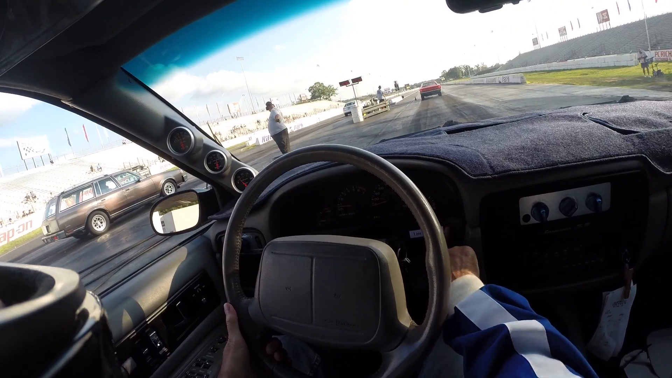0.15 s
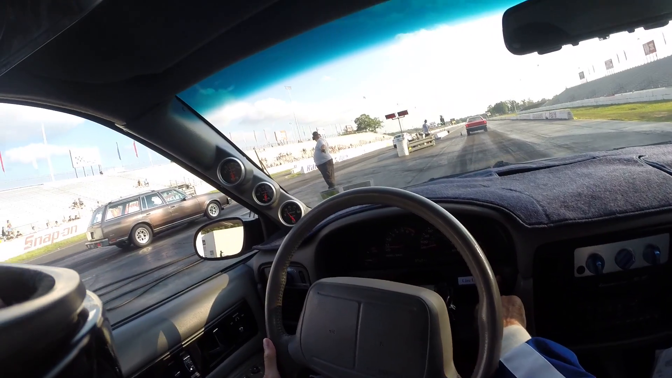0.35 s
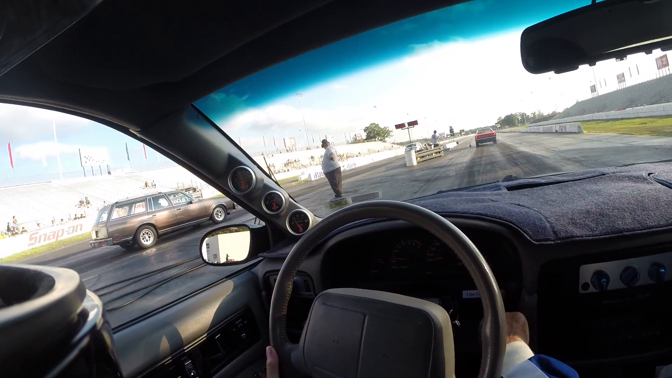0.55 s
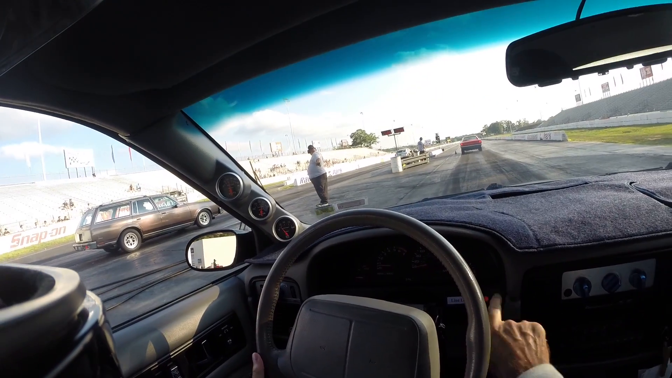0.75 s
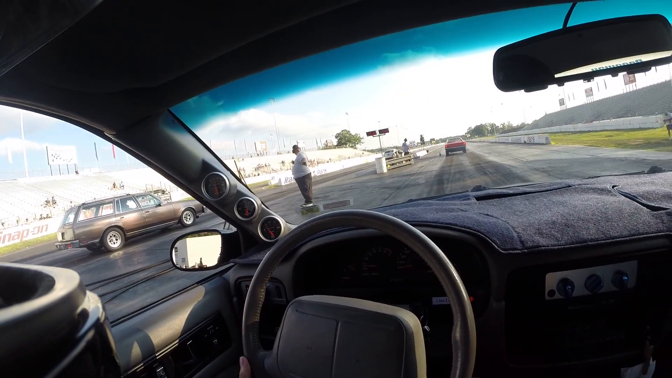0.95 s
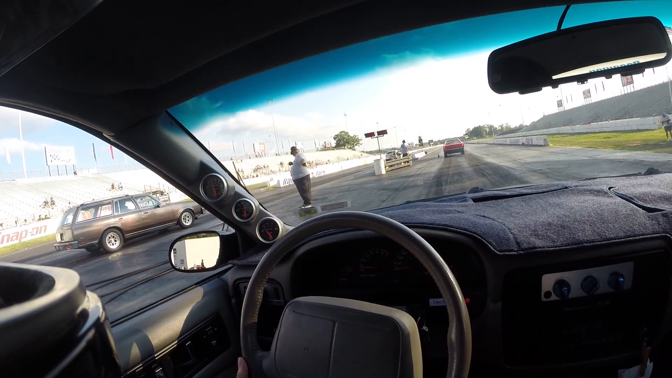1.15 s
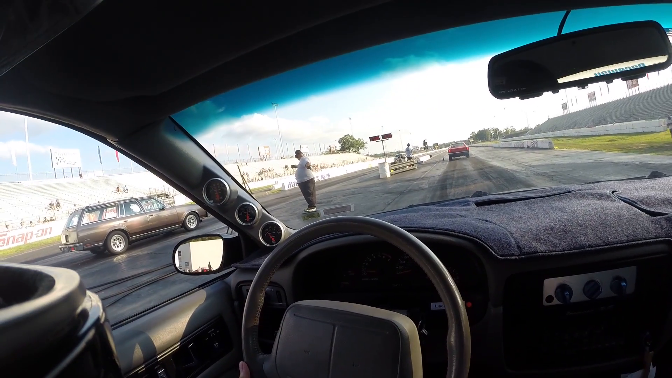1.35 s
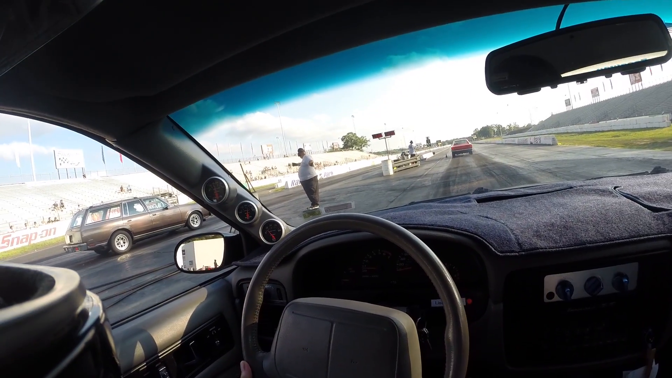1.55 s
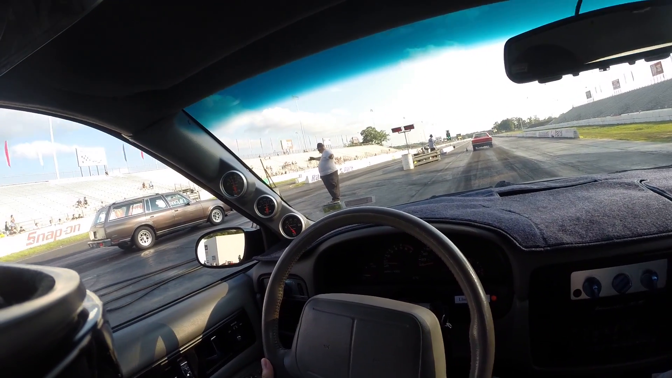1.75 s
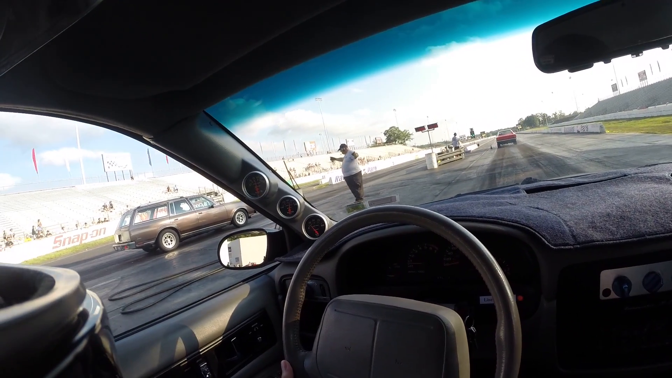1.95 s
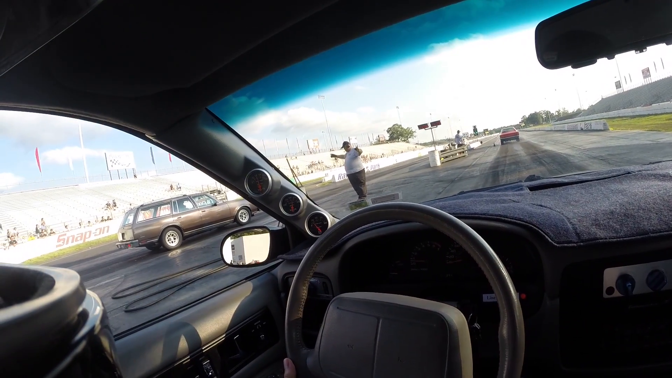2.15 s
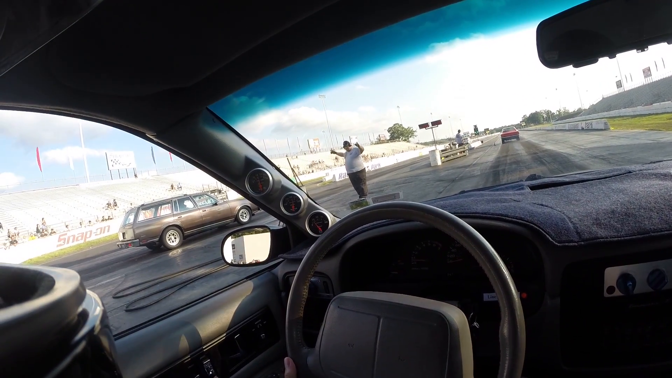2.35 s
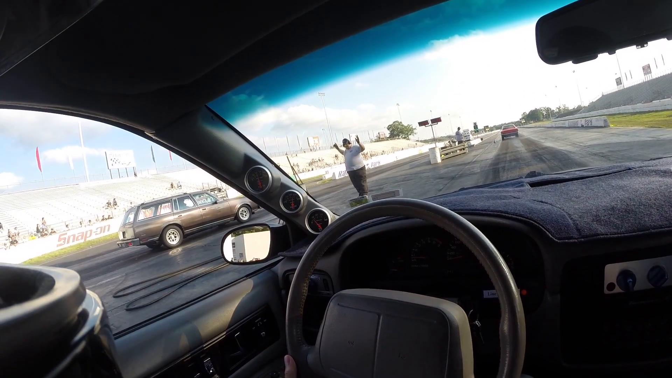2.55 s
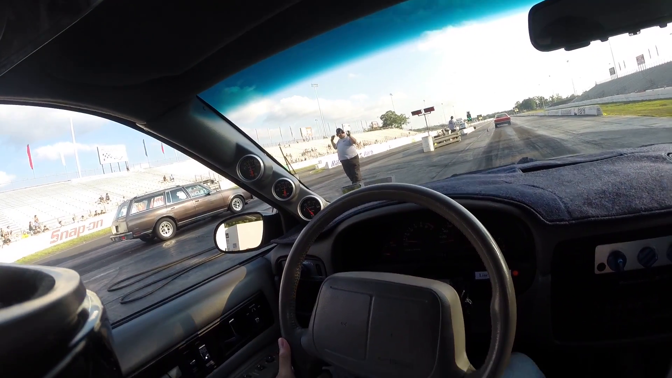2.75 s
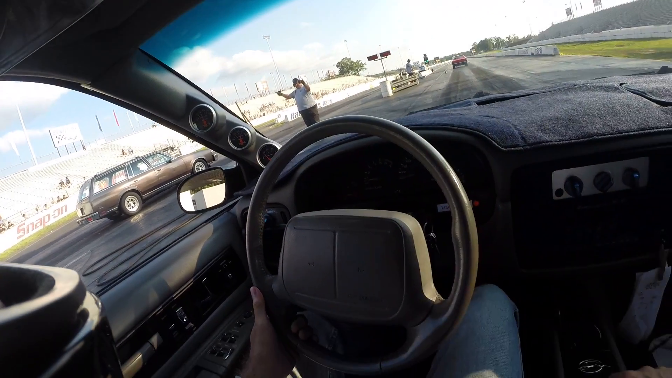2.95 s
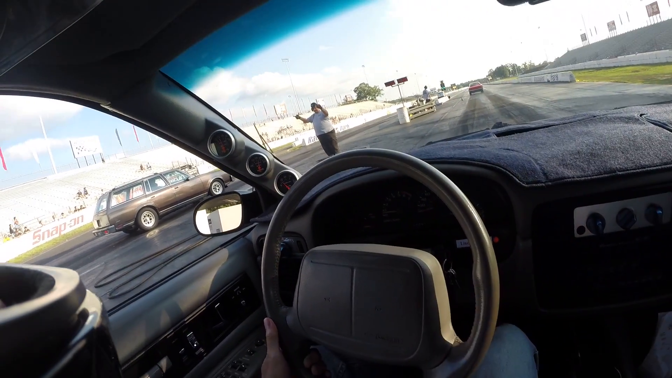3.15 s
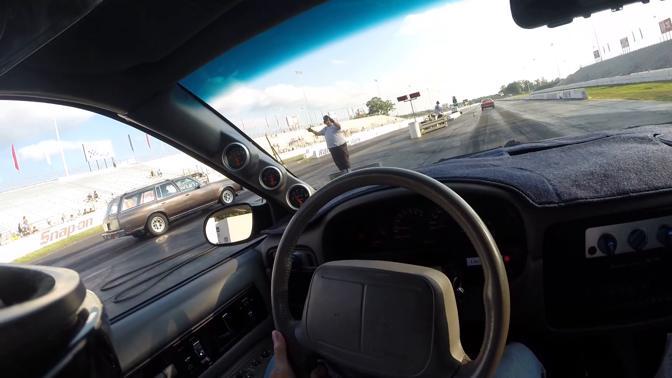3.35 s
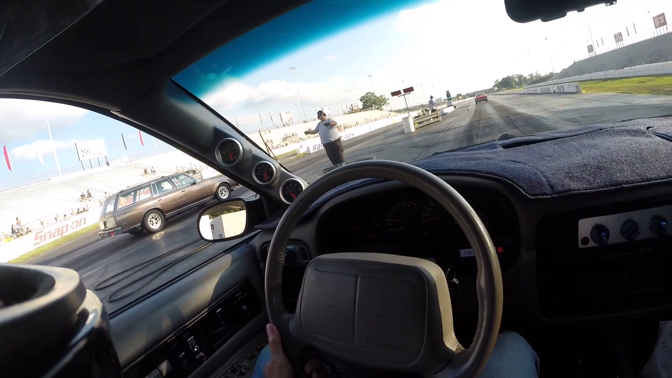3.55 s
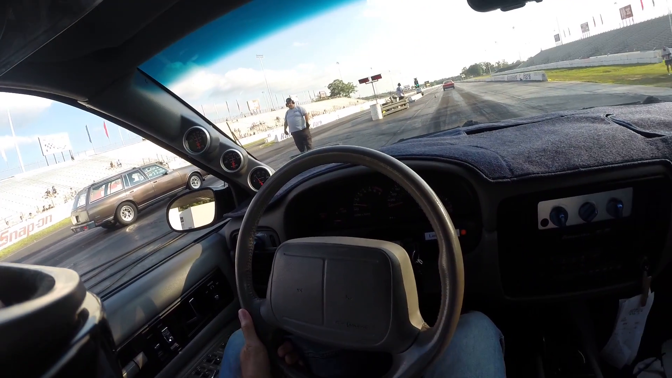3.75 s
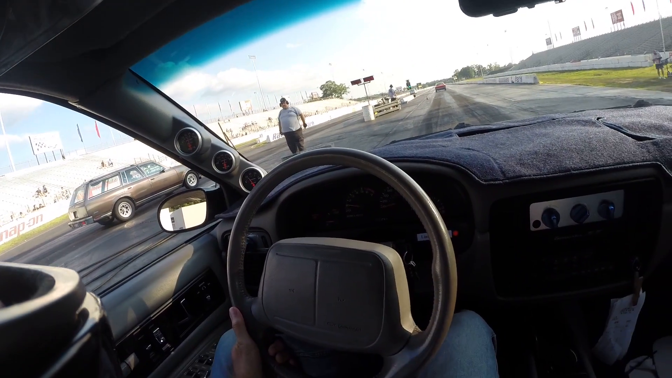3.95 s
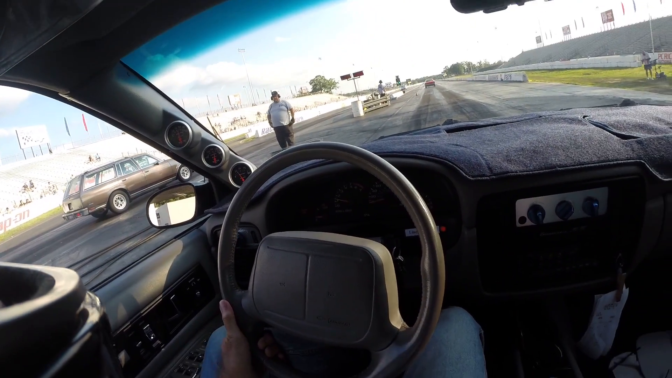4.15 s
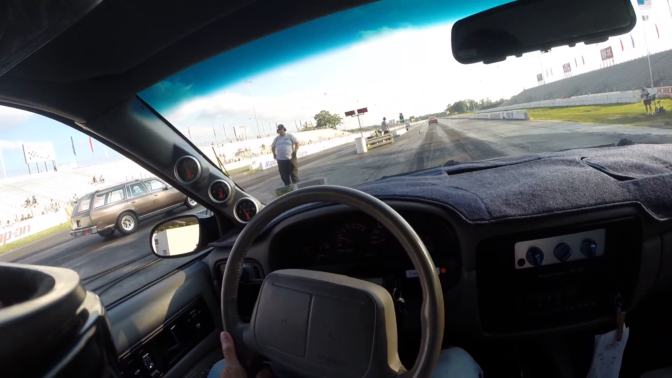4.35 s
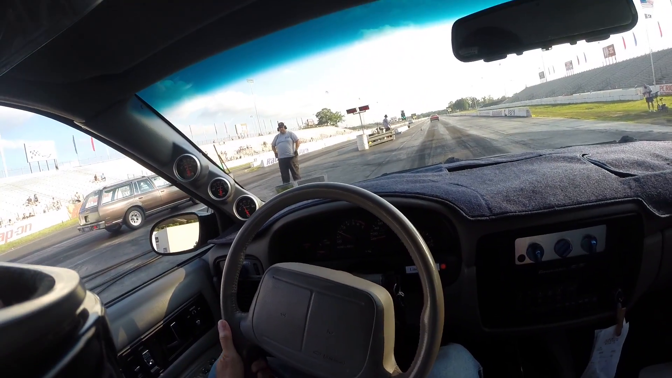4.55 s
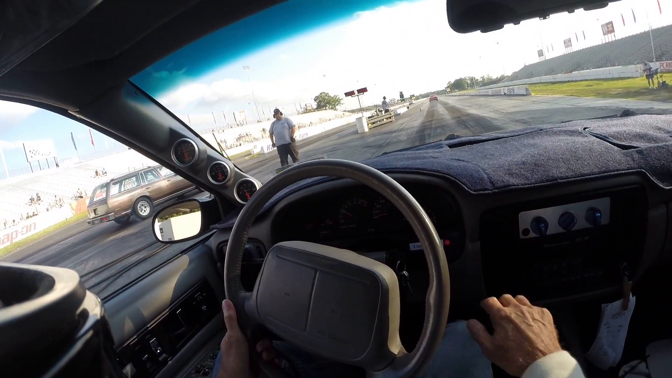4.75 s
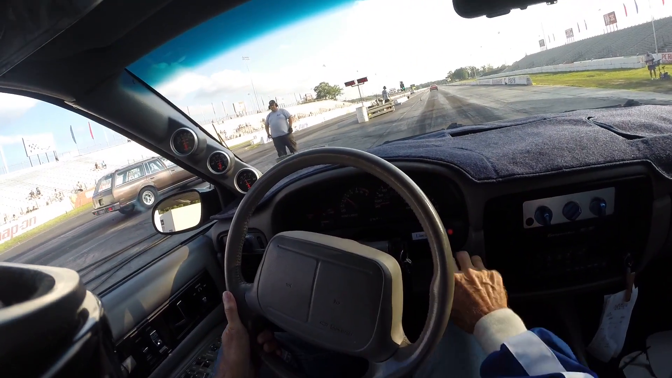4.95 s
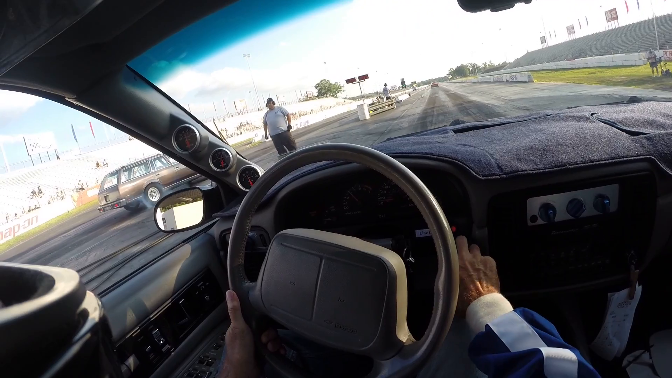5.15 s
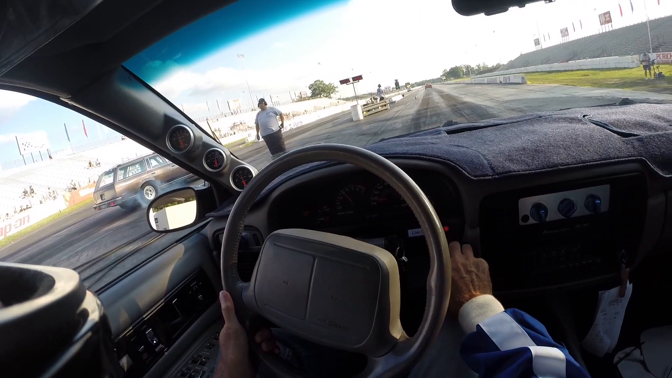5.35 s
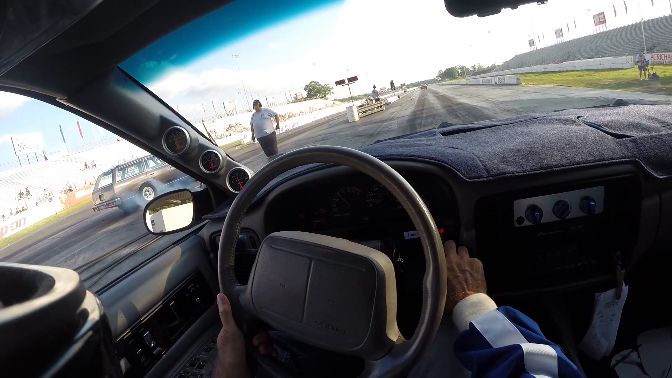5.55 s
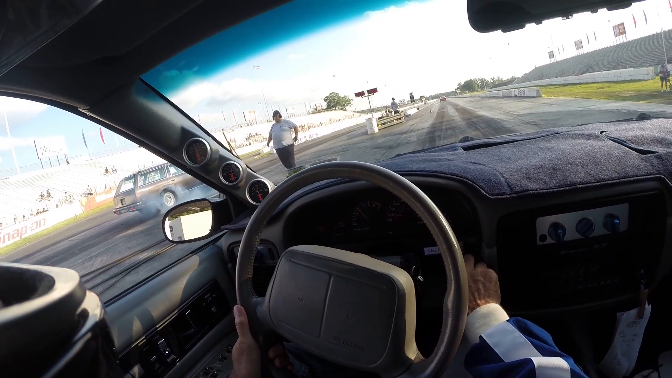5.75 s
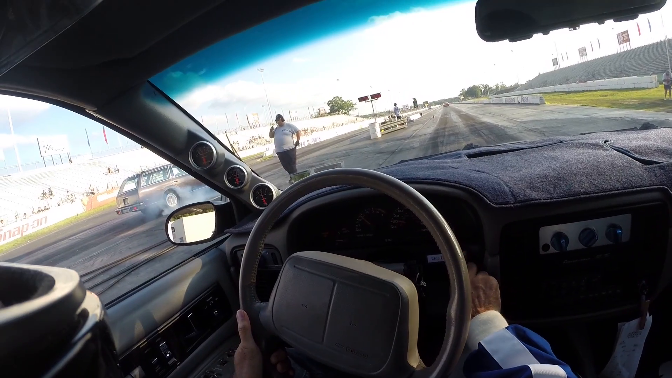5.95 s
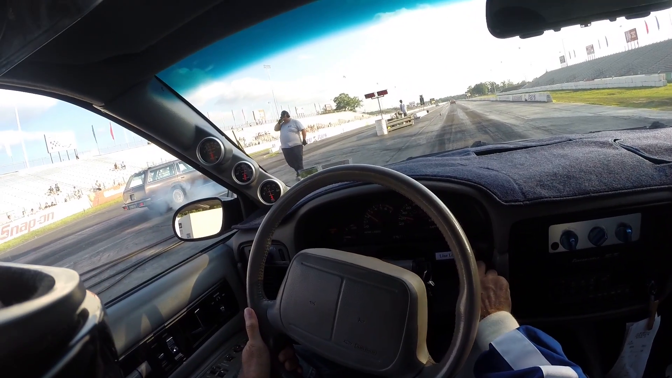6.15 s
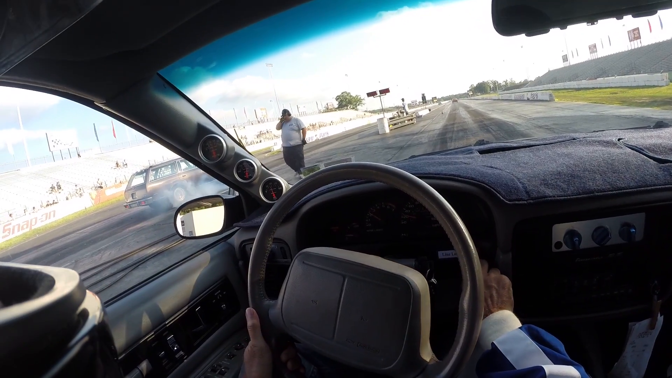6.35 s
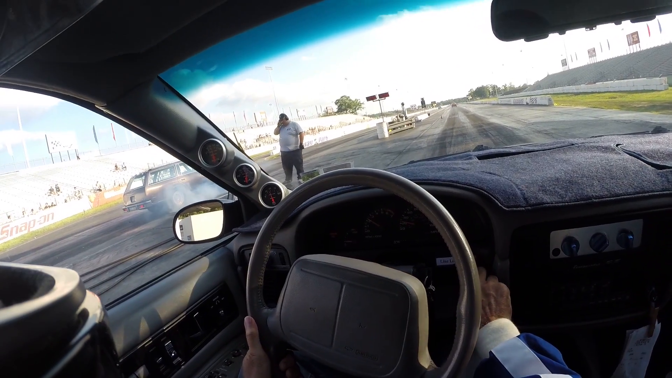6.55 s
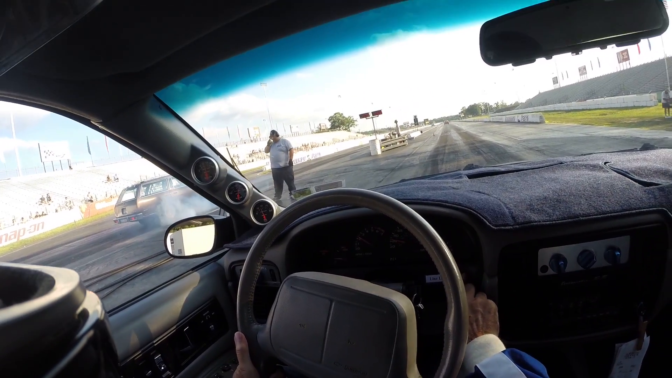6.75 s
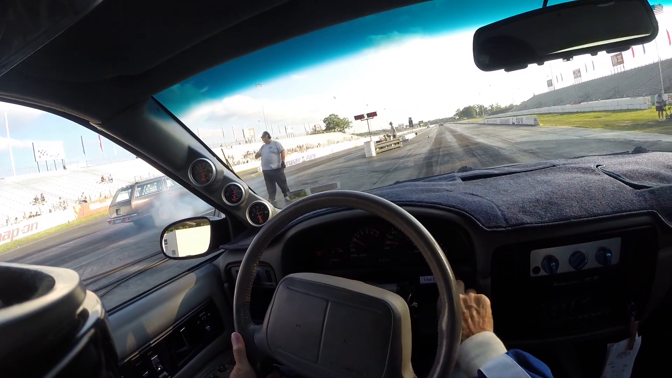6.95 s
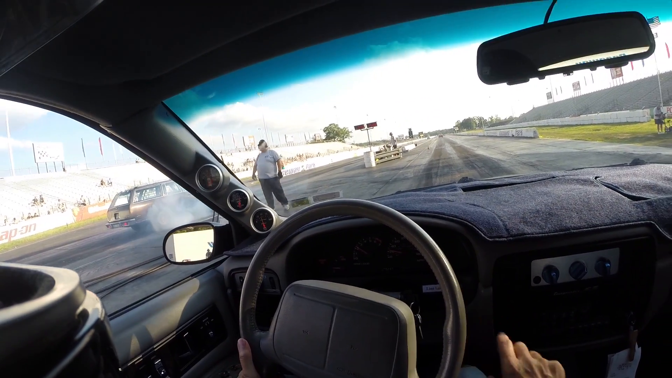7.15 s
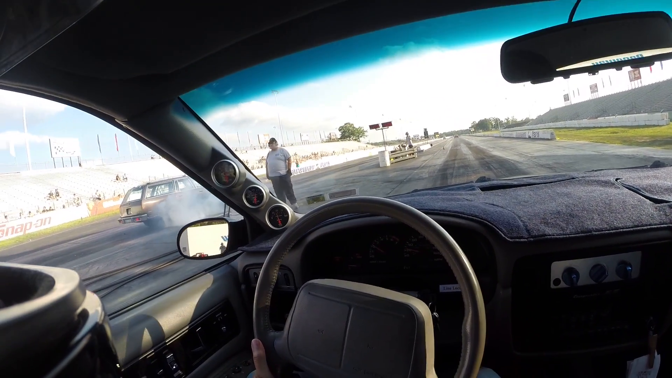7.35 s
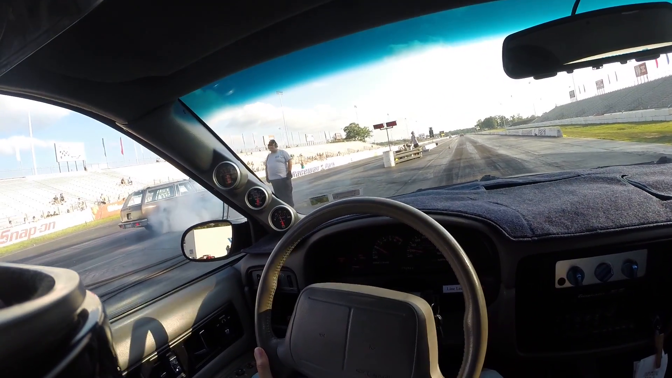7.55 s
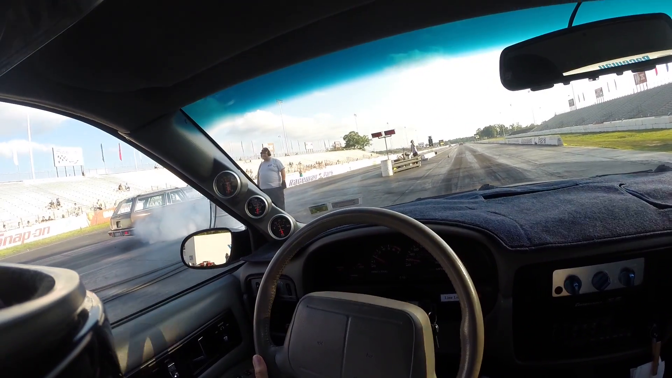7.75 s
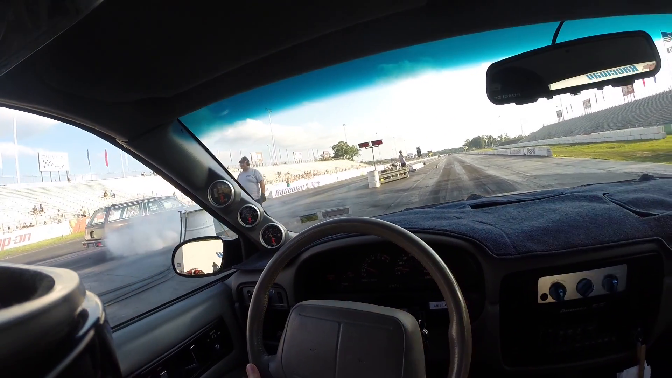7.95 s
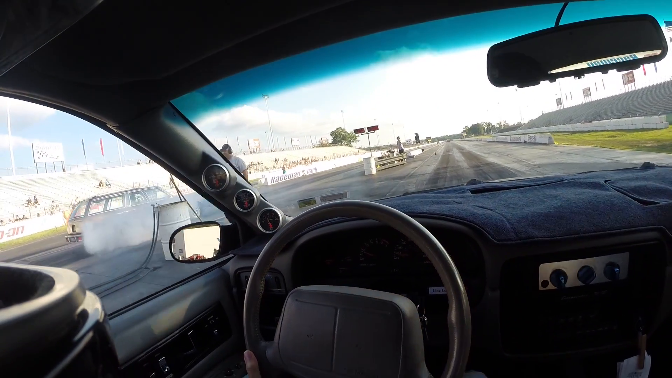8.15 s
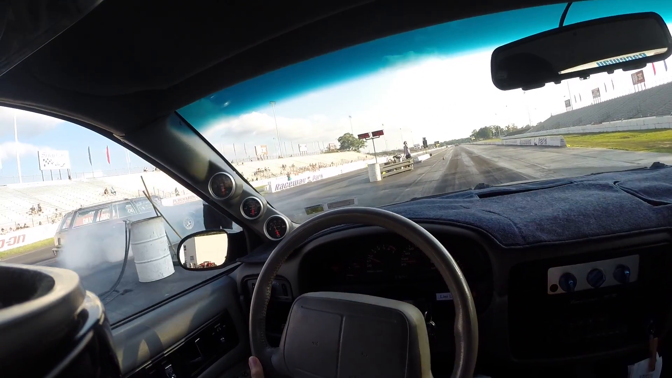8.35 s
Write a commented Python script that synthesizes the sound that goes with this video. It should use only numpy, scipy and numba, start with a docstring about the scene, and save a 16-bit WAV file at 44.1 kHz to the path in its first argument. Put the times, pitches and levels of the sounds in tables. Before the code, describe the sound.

Heard from inside a car at a drag strip, engines idle with a deep, steady rumble. A car ahead accelerates into the distance with a brief rasp. Then a V8 alongside climbs to a roar and holds its revs in a burnout, with wavering tyre squeal and sharp chirps near the end. The listener's own engine rises a little as the car creeps, and loose cabin trim ticks and knocks.

```python
"""A low engine idle booms inside a closed car at a drag strip; loose trim ticks, circuits buzz faintly.
A car pulls away down the track, its exhaust rasp fading. The listener's car creeps, and the V8 in the
next lane revs up and spins its tyres: tread patches squeal and scrub over the roar.
Engines are sums of orders plus gas noise puffed by the firings. Cabin resonances colour the V8's
orders, and the body heaves on its mounts."""
import sys
import numpy as np
from scipy import signal
from scipy.fft import rfft, irfft, next_fast_len
from scipy.io import wavfile
from scipy.ndimage import uniform_filter1d
from numba import njit

SR = 44100
rng = np.random.default_rng(int(sys.argv[2]) if len(sys.argv) > 2 else 0)


def put_to_file(sound):
    """Save the sound as 16-bit audio at rate SR, in the file named by the first command-line argument."""
    columns = np.atleast_2d(sound).T  # one column per channel
    safe = np.clip(columns, -1, 1)
    whole_steps = np.round(safe * 32767)
    wavfile.write(sys.argv[1], SR, whole_steps.astype(np.int16))


N = 371322
TIME_S = np.arange(N) / SR
CONTROL_SAMPLES = np.arange(0, N + 64, 64)

# Next-lane V8 speed: time_s, cycles_per_s
V8_SPEED = [(0, 6.1), (.8, 6.1), (1.0, 5.5), (1.33, 5.2), (1.55, 6.15), (3.2, 6.15), (3.4, 6.3), (3.6, 7.7),
            (3.72, 8.28), (4.08, 10.7), (4.68, 17.45), (4.8, 19.0), (5.16, 26.5), (5.28, 27.7),
            (5.4, 28.05), (5.52, 27.4), (5.76, 23.5), (6.24, 18.7), (6.36, 18.15), (6.72, 19.15),
            (6.96, 19.0), (7.28, 18.45), (7.7, 16.0), (8.04, 12.95), (8.16, 13.1), (8.28, 13.95),
            (8.42, 14.05)]
# Its firing order: time_s, level_db
V8_LOAD = [(0, -32.5), (.2, -35.5), (.36, -32.5), (.54, -39), (.65, -30), (.82, -50), (.93, -56),
           (1.05, -34), (1.2, -62), (1.55, -38), (1.9, -31.5), (2.08, -51), (2.3, -40), (2.9, -37),
           (3.2, -46), (3.5, -39), (3.78, -19.5), (3.92, -27.5), (4.1, -20), (4.6, -22), (4.95, -45),
           (5.18, -23.5), (5.34, -23), (5.8, -28.5), (6.16, -31), (6.44, -20.5), (6.72, -30.5), (7.14, -27),
           (7.3, -25), (7.56, -19.5), (7.98, -22.5), (8.26, -19.5), (8.42, -22.5)]
# Firing order, then in-between orders: cycle_multiple, gain_db
V8_ORDERS = [(8, 0), (1, -3), (2, 0), (3, 2), (4, -3), (5, 4), (6, 5), (7, 6)]
# Orders from uneven exhaust lengths: cycle_multiple, gain_db
V8_UNEVEN_ORDERS = [(9, -5), (10, -3), (11, -4), (12, 3), (16, -2.5), (24, -6), (32, -8), (40, -9)]
# Cabin response: freq_hz, gain_db
CABIN_RESPONSE = [(5, -9.2), (15, -0.2), (30, 2.5), (45, 7.1), (65, -2.2), (85, 4.6), (100, 2.9),
                  (115, 9.9), (130, 10.2), (145, 2.9), (160, -6), (185, -10), (230, -7.7)]
# Exhaust noise spectra: freq_hz, density_db
ROAR_SPECTRUM = [(21, -36), (35, -20), (65, -12.5), (100, -16), (130, -15), (187, -24), (254, -18),
                 (330, -19), (400, -24), (500, -26), (685, -29), (806, -27), (1000, -25.5), (1200, -31),
                 (1450, -46), (2600, -56), (4000, -90)]
MID_SPECTRUM = [(340, -19), (440, 12.5), (540, 10), (720, 15.5), (850, -50.5)]
HISS_SPECTRUM = [(880, -24), (1500, 0.5), (1810, -4), (2310, -4), (2780, -6.5), (3470, -5), (4350, -9.5),
                 (4750, -8), (5390, -9.5), (5830, -12.5), (6750, -13), (8050, -23), (10000, -36),
                 (13400, -52), (14600, -55), (15500, -71.5)]
GROWL_SPECTRUM = [(110, -26), (170, 4.5), (300, -4.5), (460, -1), (680, -9), (900, -27.5), (1300, -62)]
# Rasp as the V8's throttle opens: time_s, level_db
GROWL_LEVEL = [(3.45, -62), (3.62, -42), (3.9, -31.5), (4.03, -33), (4.2, -37), (4.5, -43)]

# Tread slips: time_s, pitch_hz, level_db, spread_ratio
SQUEAL_CURVE = [(4.5, 1050, -83, 0.2), (5.0, 1020, -61, 0.12), (5.5, 1037, -44.5, 0.11),
                (5.9, 1013, -49, 0.13), (6.0, 1033, -38.5, 0.11), (6.402, 1022, -38.5, 0.13),
                (7.1, 1035, -37.5, 0.13), (7.3, 1010, -37.5, 0.18), (7.551, 1010, -36.5, 0.11),
                (7.62, 990, -41, 0.13), (7.7, 970, -40, 0.12), (7.9, 950, -43, 0.13),
                (7.97, 976, -45, 0.068), (8.35, 1060, -52, 0.15)]
# Short squeaks and three falling engine overtones: start_s, length_s, from_hz, to_hz, peak_db
SHORT_TONES = [(3.93, .04, 1440, 1470, -52), (3.945, .02, 1680, 1700, -55), (4.0, .03, 1700, 1610, -51),
               (4.035, .035, 1470, 1500, -53), (4.15, .04, 1740, 1770, -58), (5.66, .24, 970, 870, -36),
               (5.68, .2, 1450, 1330, -48), (5.72, .18, 1170, 1100, -41), (6.27, .06, 925, 915, -31),
               (6.84, .09, 985, 1020, -31), (7.04, .09, 990, 1010, -31), (7.34, .11, 1230, 1190, -30),
               (7.49, .1, 2180, 2170, -52), (7.565, .035, 950, 985, -27), (7.62, .075, 970, 940, -23),
               (7.685, .05, 930, 895, -25), (7.73, .055, 925, 950, -27), (7.785, .06, 885, 925, -28),
               (7.845, .045, 905, 900, -29), (7.885, .04, 895, 915, -34)]
FALLING_OVERTONES, SHORT_SQUEAKS = SHORT_TONES[5:8], SHORT_TONES[:5] + SHORT_TONES[8:]
# Tread scrub: freq_hz, density_db
SCRUB_SPECTRUM = [(1300, -24), (1550, 2.5), (1900, -7), (2250, -0.5), (2500, -6), (3600, -9.5),
                  (6500, -29.5), (8000, -41.5)]
# Bodywork resonances: freq_hz, width_hz, gain_db
BODY_MODES = [(1730, 33, 1), (1942, 24, 6), (2113, 39, 5.5), (2280, 35, 3.5), (3500, 160, -2)]

# Own engine speed: time_s, firings_per_s
OWN_SPEED = [(0, 40.1), (.4, 40.1), (1.15, 41.1), (2.0, 40.4), (2.9, 41.5), (3.2, 44.0), (3.5, 47.9),
             (3.9, 54.5), (4.1, 55.8), (4.57, 62.4), (4.75, 60.9), (4.95, 59.5), (5.4, 62.2), (5.52, 62.1),
             (5.8, 56.6), (5.95, 54.9), (6.2, 54.2), (6.5, 53.75), (7.0, 53.5), (8.42, 53.3)]
# Its orders under load: time_s, low_db, upper_db
OWN_LOAD = [(0, -34.5, -48), (.9, -34, -52), (1.15, -33, -53), (1.35, -40, -54), (1.6, -38, -50),
            (2.9, -37, -50), (3.3, -36.5, -51), (3.8, -29.5, -48), (4.15, -34, -42), (4.4, -36, -33),
            (5.3, -37, -33), (5.7, -45, -35), (6.2, -42, -36), (7.5, -38.5, -34), (8.05, -36, -33),
            (8.42, -36, -36)]
# Its low and upper orders: firing_multiple, gain_db
OWN_LOW = [(1, -5), (2, -3), (3, 4), (6, -10.5)]
OWN_UPPER = [(4, 2), (5, -3), (7, -12), (8, -7), (9, -6), (10, -11), (10.5, -11), (11, -9), (12, -14),
             (13, -12), (14, -13), (16, -20)]
# Its exhaust as heard in the cabin: freq_hz, gain_db
OWN_RESPONSE = [(30, 0), (300, 0), (330, -6), (400, -6), (430, -3), (455, -2), (480, 5), (505, 3),
                (515, -4), (525, -12), (565, -7), (625, -4), (650, -6), (700, -3), (1130, -6)]
# Body swings: start_s, length_s, from_hz, to_hz, peak_db
BODY_HEAVES = [(3.3, 0.24, 43.4, 45, -21), (3.655, 0.34, 43, 45, -16.5), (3.837, 0.66, 32, 13.5, -15),
               (5.505, 0.28, 19, 25, -16), (7.355, 1, 21.6, 18.3, -21.5)]

# Departing car's engine speed: time_s, cycles_per_s
FAR_SPEED = [(1.45, 18.4), (1.65, 22.2), (1.8, 23.6), (2.0, 23.97), (2.2, 23.7), (2.35, 23.1), (2.6, 23.63),
             (3.0, 25.03), (4.2, 28.33), (5.0, 31.0), (6.0, 34.5), (7.5, 39.3), (8.42, 42.0)]
# Its firing order and its other orders: time_s, level_db
FAR_FIRING_LEVEL = [(1.45, -34), (1.7, -37), (2.05, -32), (2.25, -42.5), (2.6, -35), (3.3, -41),
                    (3.65, -29.5), (4.05, -32.5), (4.25, -31), (4.8, -43), (5.25, -28), (5.6, -34),
                    (6.15, -24), (6.62, -28), (6.85, -26), (7.45, -36), (8.05, -34), (8.42, -34.5)]
FAR_OTHER_LEVEL = [(1.45, -40), (2.3, -45), (8.42, -60)]
# Its other orders: cycle_multiple, gain_db
FAR_OTHER_ORDERS = [(6, 6.5), (10, -6), (12, -2), (14, -1.5)]
# Flat open-air path: freq_hz, gain_db
AIR_RESPONSE = [(20, 0), (2000, 0)]
# Its exhaust rasp: freq_hz, density_db
RASP_SPECTRUM = [(200, -34), (330, 6.5), (450, 2), (600, -11), (900, -3.5), (1100, -19), (1400, -50.5)]
# Its throttle barks: start_s, length_s, from_hz, to_hz, peak_db
EXHAUST_BARKS = [(1.46, 0.08, 125, 137, -21.5), (1.514, 0.11, 293.6, 341, -32),
                 (1.63, 0.055, 128, 119, -24.5), (1.71, 0.088, 313, 351, -38),
                 (1.847, 0.034, 374, 400, -31), (1.851, 0.054, 438, 470, -36.5)]

# Gear tones: start_s, end_s, from_hz, to_hz, level_db
GEAR_WHINES = [(4.85, 5.36, 1030, 1075, -43), (7.95, 8.5, 1040, 1072, -45)]
# Loose trim: start_s, tick_db, knock_db
TRIM_TICKS = [(0.094, -68, -41), (0.116, -45, -36), (0.1264, -77, -52), (0.15, -47, -36), (0.333, -71, -46),
              (4.0346, -30, -23.5), (4.221, -31, -25), (4.345, -34.5, -28), (4.447, -38, -33),
              (4.4821, -44, -45), (5.161, -35.5, -35), (5.359, -40, -38), (5.5691, -25.5, -26),
              (5.6047, -46, -39), (5.837, -47, -46), (6.921, -24.5, -33), (7.038, -37, -26),
              (7.102, -30, -19), (7.21, -36, -39), (7.3321, -48, -38), (7.3896, -48, -45),
              (7.858, -29.5, -25), (7.925, -37, -26), (7.975, -33.5, -52), (8.0446, -47, -52)]
# Bright part of a tick: freq_hz, density_db
TICK_SPECTRUM = [(1760, -27.5), (3000, -4.5), (5270, -1), (5920, -1.5), (6740, -1.5), (9000, -10),
                 (12400, -15), (15500, -35)]
# Blows on the panel: start_s, level_db
PANEL_BLOWS = [(0.092, -40), (0.1264, -41), (0.1511, -41), (0.178, -46), (0.331, -33.5), (4.2214, -33)]
# Panel under the trim: freq_hz, gain_db, t60_s
PANEL_MODES = [(530, -6, .05), (850, -5, .045), (1070, 0, .055), (1430, -14, .045), (1800, -17, .04),
               (2400, -23, .04), (2890, -24, .03)]
# Circuit resonances: freq_hz, width_hz, gain_db
CIRCUIT_MODES = [(5350, 200, -2), (5660, 140, 2), (6100, 150, 3), (6514, 60, 3), (10400, 220, -5),
                 (10960, 260, -4)]
# Bursts of all resonances, and of the top two: start_s, end_s, level_db
FULL_BURSTS = [(.475, 0.59, -70), (0.713, .84, -67.5), (0.97, 1.095, -68), (1.115, 1.253, -67.5),
               (1.374, 1.505, -68), (1.525, 1.565, -69)]
HIGH_BURSTS = [(1.773, 1.82, -76), (6.828, 6.871, -72), (8.26, 8.31, -73)]
# Faint, short, very high pips: start_s
FAINT_PIPS = [.0388, .325, 1.5673, 1.8254, 1.9814, 2.1715, 2.4788, 2.5426, 2.8444, 3.0194, 3.1931, 3.481,
              3.682, 3.8891]
# Background rumble, trim knock, body shudder: freq_hz, density_db
AMBIENT_SPECTRUM = [(15, -44), (25, 15.5), (45, 18), (65, 30), (101, 26), (126, 28), (148, 19), (178, 12.5),
                    (215, 18.5), (260, 18.5), (322, 13.5), (508, -45), (582, -76.5), (1050, -62),
                    (1450, -106), (6370, -37.5), (9500, -43), (12500, -61.5), (15500, -91.5)]
KNOCK_SPECTRUM = [(600, -22), (1000, 0), (1400, -10), (1800, -20), (3000, -20), (4500, -30), (8000, -60)]
SHUDDER_SPECTRUM = [(6, -33.5), (15, 17.0), (25, 21.5), (30, -45.5)]

FIRINGS_PER_CYCLE, IDLE_CYCLES_PER_S = 8, 6.0
ROAR_TOP_OCT, HISS_TOP_OCT = 1.974, 1.45  # levels stop rising this far above idle


def v8_engine():
    """Firing tone and lumpy in-between orders, coloured by the cabin."""
    cycle_hz, firing_db = curves(V8_SPEED)[0], curves(V8_LOAD)[0]
    uneven_db = -50.5 + 9 * np.minimum(v8_octaves(), ROAR_TOP_OCT)
    firing = orders(cycle_hz, firing_db, V8_ORDERS[:1], CABIN_RESPONSE, waver_db=1, waver_hz=20)
    uneven = orders(cycle_hz, uneven_db, V8_ORDERS[1:] + V8_UNEVEN_ORDERS, CABIN_RESPONSE,
                    waver_db=1, waver_hz=8.7)
    return firing + uneven


def v8_roar():
    """Turbulent gas puffed by the firings, body shudder below, hiss above; all grow with speed."""
    octaves = v8_octaves()
    capped_oct = np.clip(octaves, 0, HISS_TOP_OCT)
    rise_oct_per_s = uniform_filter1d(np.gradient(octaves, CONTROL_SAMPLES / SR), size=150)
    roar_db = -42.5 + 8 * np.minimum(octaves, ROAR_TOP_OCT) + drift(7.8)
    shudder_db = -42 + 4 * octaves + drift(5)
    hiss_db = -63.5 + 6 * capped_oct + 1.2 * drift(30)
    mid_db = roar_db - 15.5 + 2.5 * capped_oct - 2 * np.clip(rise_oct_per_s, 0, 1.5)
    puffs = 1 + 0.034 * np.sin(2 * np.pi * firing_count(V8_SPEED))
    gas = noise(ROAR_SPECTRUM, puffs) * envelope(roar_db)
    shudder = noise(SHUDDER_SPECTRUM) * envelope(shudder_db)
    hiss = noise(HISS_SPECTRUM, puffs) * envelope(hiss_db)
    mid = noise(MID_SPECTRUM, puffs) * envelope(mid_db)
    return gas + mid + shudder + hiss


def v8_growl(decay_per_firing=3.0):
    """Each firing spits a short puff of random strength."""
    firings = firing_count(V8_SPEED)
    strength = amp(2.5 * rng.standard_normal(2000))[firings.astype(int)]
    puffs = strength * np.exp(-decay_per_firing * (firings % 1))
    window = gate(GROWL_LEVEL[0][0], GROWL_LEVEL[-1][0], edge_s=.05)
    return window * envelope(curves(GROWL_LEVEL)[0]) * noise(GROWL_SPECTRUM, puffs)


def engine_overtones():
    """High engine overtones fall as the revs drop."""
    return glides(FALLING_OVERTONES, octave_db=-29)


def tyre_squeal(slips_per_s=270, slip_s=.037):
    """Tread patches squeak one over another, each at its own pitch."""
    time_s, pitch_hz, level_db, spread = np.transpose(SQUEAL_CURVE)
    slips = []
    for i, (jitter, detune, glide, size) in enumerate(rng.standard_normal((1300, 4))):
        start_s = time_s[0] + (i + jitter) / slips_per_s
        if time_s[0] < start_s < time_s[-1]:
            log_detune = np.interp(start_s, time_s, spread) * 1.9 * np.tanh(detune / 1.9 - .05)
            hz = np.interp(start_s, time_s, pitch_hz) * np.exp(log_detune)
            peak_db = np.interp(start_s, time_s, level_db) + 3 * size
            slips.append((start_s, slip_s, hz * (1 - .012 * glide), hz * (1 + .012 * glide), peak_db))
    return glides(slips, octave_db=-25) + glides(SHORT_SQUEAKS, octave_db=-29)


def tyre_scrub():
    """Grainy tread noise follows the squeal's level; bodywork picks out narrow pitches."""
    level_db = curves(SQUEAL_CURVE)[1] - 17.5 + 2.5 * drift(25)
    out = noise(SCRUB_SPECTRUM)
    for hz, width_hz, gain_db in BODY_MODES:
        ring = resonance(rng.standard_normal(N), hz, width_hz)
        flare = envelope(4 * drift(4))
        out += amp(gain_db - 9) * rms_one(ring * flare)
    return gate(SQUEAL_CURVE[0][0], edge_s=.3) * out * envelope(level_db)


def own_engine():
    """Slightly irregular firings; the upper orders open up under load."""
    firing_hz = curves(OWN_SPEED)[0] * (1 + 0.0017 * drift(1.64))
    low_db, upper_db = curves(OWN_LOAD)
    return (orders(firing_hz, low_db, OWN_LOW, OWN_RESPONSE, waver_db=3.5, waver_hz=6)
            + orders(firing_hz, upper_db, OWN_UPPER, OWN_RESPONSE, waver_db=0.5, waver_hz=6.3))


def body_heaves():
    """The shell swings on its mounts as torque comes on."""
    return glides(BODY_HEAVES, octave_db=-17.5)


def far_engine():
    """Only the departing car's strongest orders carry; the air makes them flutter."""
    cycle_hz = curves(FAR_SPEED)[0]
    firing_db, other_db = curves(FAR_FIRING_LEVEL)[0], curves(FAR_OTHER_LEVEL)[0]
    firing = orders(cycle_hz, firing_db, [(FIRINGS_PER_CYCLE, 0)], AIR_RESPONSE,
                    waver_db=2.8, waver_hz=18)
    others = orders(cycle_hz, other_db, FAR_OTHER_ORDERS, AIR_RESPONSE, waver_db=-0.5, waver_hz=2.4)
    return gate(FAR_SPEED[0][0], edge_s=0.095) * (firing + others)


def far_exhaust(fade_db_per_s=3.5):
    """Barks as the throttle opens; rasp, chopped by the firings, fades as the car draws off."""
    start_s = FAR_SPEED[0][0]
    chop = 1 + 0.44 * np.sin(2 * np.pi * firing_count(FAR_SPEED))
    fade = amp(-42.5 - fade_db_per_s * np.maximum(TIME_S - start_s, 0))
    rasp = gate(start_s, edge_s=0.2) * fade * noise(RASP_SPECTRUM, chop)
    return rasp + glides(EXHAUST_BARKS, octave_db=-17)


def gear_whine():
    """Thin gear tones that climb slowly."""
    out = np.zeros(N)
    for start_s, end_s, from_hz, to_hz, level_db in GEAR_WHINES:
        hz = np.interp(TIME_S, [start_s, end_s], [from_hz, to_hz]) * upsample(1 + .002 * drift(8))
        tone = np.sqrt(2) * np.sin(2 * np.pi * np.cumsum(hz) / SR)
        out += gate(start_s, end_s, edge_s=.06) * envelope(level_db + 3 * drift(12)) * tone
    return out


def trim_ticks(t60_s=0.065):
    """Loose trim: a sharp noise burst with a duller knock in the panel."""
    bright, dull = noise(TICK_SPECTRUM), noise(KNOCK_SPECTRUM)
    decay = amp(-60 * TIME_S[:4000] / t60_s)
    out = np.zeros(N)
    for start_s, tick_db, knock_db in TRIM_TICKS:
        i = round(start_s * SR)
        burst = amp(tick_db - 12.5) * bright + amp(knock_db - 9) * dull * gate(start_s, edge_s=.002)
        out[i:i + len(decay)] += decay * burst[i:i + len(decay)]
    return out


def panel_knocks():
    """Each blow rings the same panel modes at slightly random strengths."""
    out, age_s = np.zeros(N), TIME_S[:4000]
    for start_s, level_db in PANEL_BLOWS:
        i = round(start_s * SR)
        for hz, gain_db, t60_s in PANEL_MODES:
            peak_db = level_db + gain_db + 2 * rng.standard_normal()
            out[i:i + len(age_s)] += amp(peak_db - 60 * age_s / t60_s) * np.sin(2 * np.pi * hz * age_s)
    return out


def circuit_buzz(pulse_hz=133):
    """A pulse train rings treble resonances in bursts."""
    pulses = np.diff(np.floor(TIME_S * pulse_hz), prepend=0) + 1e-18
    rings = [amp(db) * resonance(pulses, hz, width_hz) for hz, width_hz, db in CIRCUIT_MODES]
    out = np.zeros(N)
    for modes, bursts in (rings, FULL_BURSTS), (rings[-2:], HIGH_BURSTS):
        out += rms_one(sum(modes)) * sum(amp(db) * gate(start_s, end_s) for start_s, end_s, db in bursts)
    return out


def faint_pips(pitch_hz=10600, length_s=0.024, peak_db=-74):
    """Faint, short, very high pips."""
    gates = sum(gate(start_s, start_s + length_s) for start_s in FAINT_PIPS)
    return amp(peak_db) * np.sin(2 * np.pi * pitch_hz * TIME_S) * gates


def ambient(level_db=-30):
    """Near-steady low rumble."""
    return noise(AMBIENT_SPECTRUM) * envelope(level_db + 0.23 * drift(1.5))


def amp(db):
    return 10 ** (np.asarray(db) / 20)


def rms_one(x):
    return x / np.sqrt(np.mean(x ** 2) + 1e-20)


def upsample(control):
    return np.interp(np.arange(N), CONTROL_SAMPLES, control)


def envelope(control_db):
    return upsample(amp(control_db))


def curves(rows):
    """Value columns of a time table at the control rate."""
    time_s, *columns = np.transpose(rows)
    return [np.interp(CONTROL_SAMPLES / SR, time_s, column) for column in columns]


def v8_octaves():
    """V8 speed in octaves above idle."""
    return np.log2(curves(V8_SPEED)[0] / IDLE_CYCLES_PER_S)


def firing_count(speed):
    return FIRINGS_PER_CYCLE * np.cumsum(upsample(curves(speed)[0])) / SR


def db_at(spectrum, hz):
    freq_hz, gain_db = np.transpose(spectrum)
    return np.interp(np.log(hz), np.log(freq_hz), gain_db)


def drift(rate_hz):
    """Slow random wander at the control rate, rms 1."""
    pole = np.exp(-2 * np.pi * rate_hz * 64 / SR)
    white = rng.standard_normal(len(CONTROL_SAMPLES) + 2000)
    return rms_one(signal.lfilter([1], [1, -2 * pole, pole * pole], white)[2000:])


def noise(spectrum, modulation=1):
    """White noise, modulated, then shaped; rms 1."""
    size = next_fast_len(N)
    hz = np.maximum(np.fft.rfftfreq(size, 1 / SR), 1)
    bins = rfft(modulation * rng.standard_normal(N), size)
    return rms_one(irfft(bins * amp(db_at(spectrum, hz)), size)[:N])


def orders(base_hz, level_db, table, response, waver_db, waver_hz):
    """Multiples of a base rate, each wavering on its own and coloured by the path as it sweeps."""
    turns, out = np.cumsum(upsample(base_hz)) / SR, np.zeros(N)
    for multiple, gain_db in table:
        order_db = level_db + gain_db + db_at(response, multiple * base_hz) + waver_db * drift(waver_hz)
        out += envelope(order_db) * np.sin(2 * np.pi * (multiple * turns + rng.random()))
    return np.sqrt(2) * out


def glides(rows, octave_db):
    """Short gliding tones, each with its octave."""
    out = np.zeros(N)
    for start_s, length_s, from_hz, to_hz, peak_db in rows:
        i, progress = round(start_s * SR), np.linspace(0, 1, int(length_s * SR))
        phase = 2 * np.pi * np.cumsum(from_hz + (to_hz - from_hz) * progress) / SR
        tone = np.sin(phase) + amp(octave_db) * np.sin(2 * phase)
        out[i:i + len(tone)] += amp(peak_db) * np.sin(np.pi * progress) * tone
    return out


def gate(start_s, end_s=np.inf, edge_s=0.0043):
    return np.clip(np.minimum(TIME_S - start_s, end_s - TIME_S) / edge_s, 0, 1)


def resonance(x, hz, width_hz):
    """Two-pole band-pass."""
    radius = np.exp(-np.pi * width_hz / SR)
    feedback = [1, -2 * radius * np.cos(2 * np.pi * hz / SR), radius ** 2]
    return np.sqrt(1 - radius ** 2) * signal.lfilter([.5, 0, -.5], feedback, x)


def scene():
    """Mono mix."""
    background = ambient()
    engines = own_engine() + v8_engine() + far_engine() + far_exhaust() + v8_roar() + v8_growl()
    tyres = tyre_squeal() + tyre_scrub()
    details = body_heaves() + gear_whine() + trim_ticks() + panel_knocks() + circuit_buzz() + faint_pips()
    return (engines + engine_overtones() + tyres + details + background)[None]


def record(dry):
    """Steep low-pass, 60 dB down from 15.6 kHz."""
    return signal.sosfilt(signal.cheby2(12, 60, 15600, fs=SR, output="sos"), dry)


dry = scene()
out = record(dry)
put_to_file(out)
```